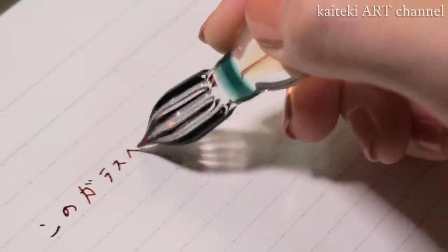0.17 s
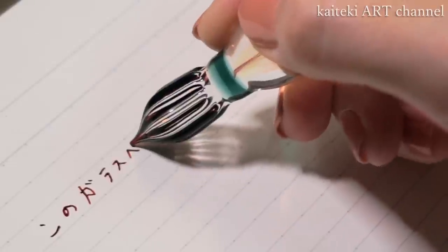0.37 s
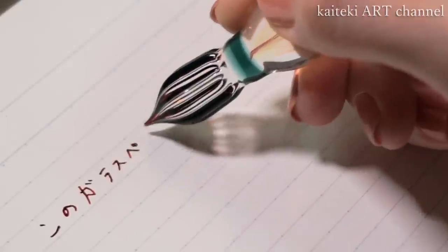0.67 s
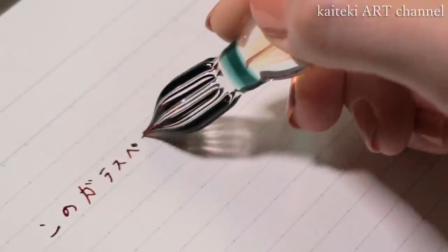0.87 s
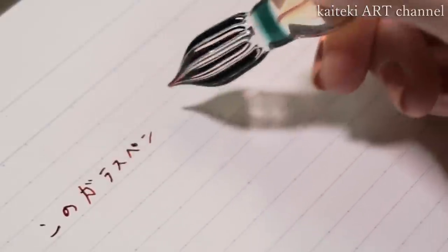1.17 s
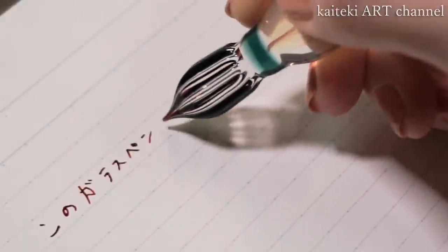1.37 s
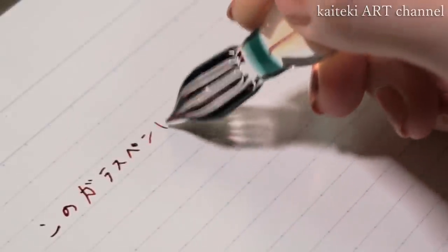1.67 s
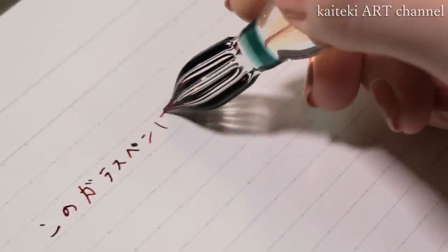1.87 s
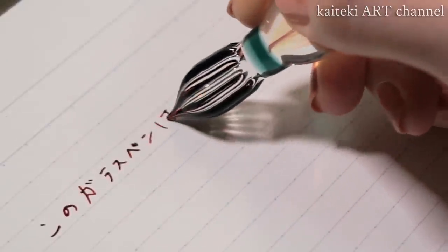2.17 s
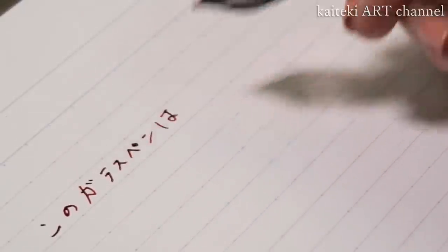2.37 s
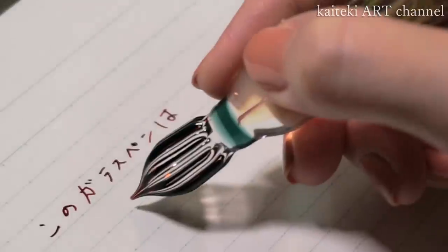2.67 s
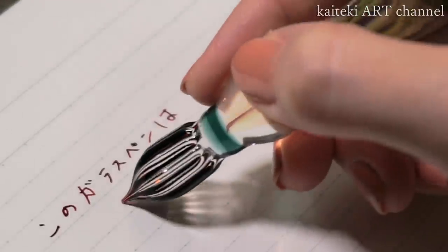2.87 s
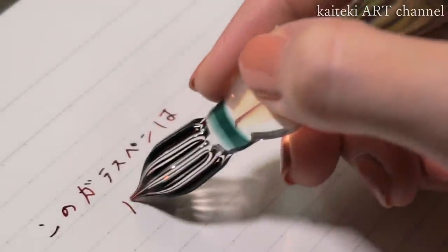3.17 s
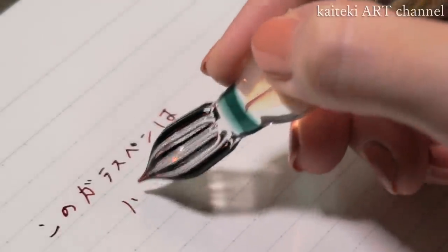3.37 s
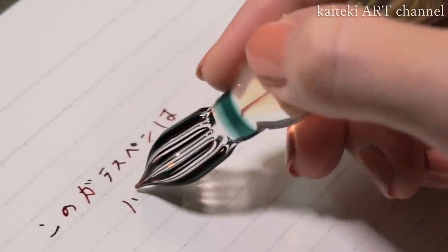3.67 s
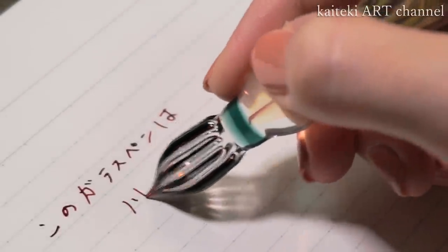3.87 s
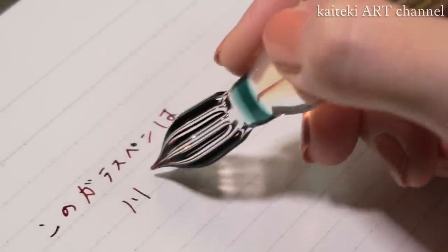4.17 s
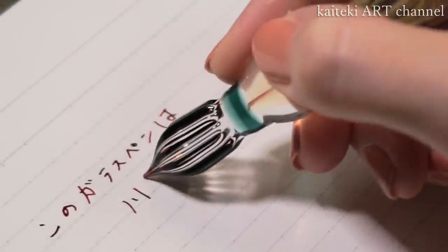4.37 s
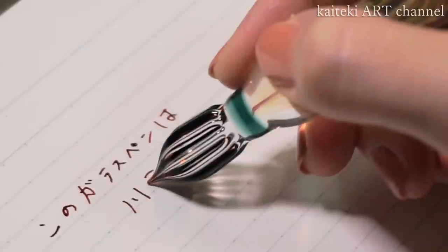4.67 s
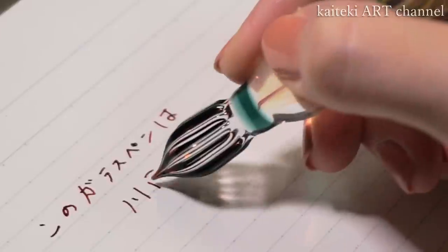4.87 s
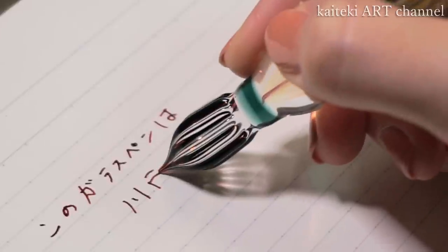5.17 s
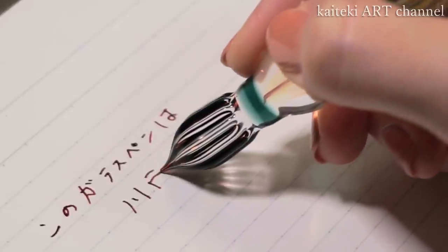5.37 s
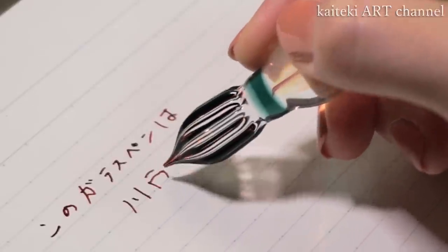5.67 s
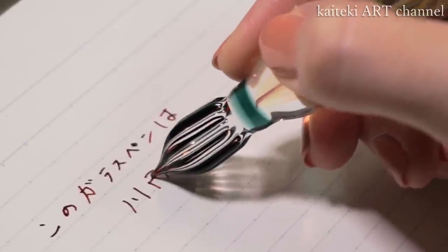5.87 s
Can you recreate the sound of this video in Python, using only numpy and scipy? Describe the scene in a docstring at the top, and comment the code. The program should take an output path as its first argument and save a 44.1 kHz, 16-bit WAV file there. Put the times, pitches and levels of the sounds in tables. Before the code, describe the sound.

Close handwriting with a glass nib: dull little desk taps, bright ticks, thin glassy scratches, and an occasional soft hiss of the hand sliding.

```python
"""First a short stroke of a glass pen on paper in a quiet room, then a knock as the pen lands on the desk.
Each landing is a push on the desk's resonances, with a ping of the glass and a woody click.
The nib ticks on the paper; random grit in each stroke makes glass, paper and desk sound.
The hand slides with a noisy hiss and rumbles low as it shifts; a faint moan and chirp are narrow noise."""
import sys
import numpy as np
from scipy import signal
from scipy.fft import rfft, irfft, next_fast_len
from scipy.io import wavfile
from scipy.ndimage import uniform_filter1d

SR = 44100
rng = np.random.default_rng(int(sys.argv[2]) if len(sys.argv) > 2 else 0)


def to_wav(s):
    """Save 16-bit WAV."""
    ch = np.atleast_2d(s).T  # columns
    pcm = np.round(np.clip(ch, -1, 1) * 32767)  # PCM
    wavfile.write(sys.argv[1], SR, pcm.astype(np.int16))


N = 265923  # length [samples]
STOP_DB = 4  # extra drop that grows very fast once a pen stroke or hand slide is past either end [dB]


def amp(db):
    """Turns dB into a gain."""
    return 10 ** (np.asarray(db) / 20)


def evened(x):
    """Scales a sound to an rms (average strength) of 1."""
    return x / np.sqrt(np.mean(x ** 2) + 1e-20)


def colour(x, points):
    """Filters a sound through (frequency [Hz], level [dB]) points on a log-frequency axis."""
    f, db = np.transpose(points)
    size = next_fast_len(len(x))
    hz = np.fft.rfftfreq(size, 1 / SR) + 1  # the 1 avoids log(0)
    gain = amp(np.interp(np.log(hz), np.log(f), db))
    return irfft(rfft(x, size) * gain, size)[:len(x)]


def resonate(x, hz, width):
    """A resonance of gain 1; a moving one shifts hz down to zero, smooths, and shifts back."""
    r = np.exp(-np.pi * width / SR)
    if np.ndim(hz) == 0:
        return 2 * signal.lfilter([1 - r], [1, -r * np.exp(2j * np.pi * hz / SR)], x).real
    turn = np.exp(2j * np.pi * np.cumsum(hz) / SR)
    return 2 * (turn * signal.lfilter([1 - r], [1, -r], x / turn)).real


def sing(x, modes):
    """Rings each mode twice over, so that the gaps between modes stay quiet."""
    return sum(amp(db) * resonate(resonate(x, hz, width), hz, width) for hz, width, db in modes)


def grit(per_s, spread_db):
    """Paper fibres catching at random moments, a few of them hard; rms 1."""
    sizes = amp(spread_db * np.minimum(rng.exponential(1, N), 4))
    sizes = sizes * rng.choice([-1, 1], N)
    caught = rng.random(N) < per_s / SR
    return evened(sizes * caught)


def patchy(x, patchy_db):
    """Random louder and softer patches, about 500 Hz by 30 ms."""
    z = signal.stft(x, nperseg=256)[2]
    patches = uniform_filter1d(rng.standard_normal(z.shape), size=3, axis=0)
    patches = uniform_filter1d(patches, size=10, axis=1)
    return signal.istft(z * amp(patchy_db * evened(patches)), nperseg=256)[1][:N]


def swells(rows, column, drop_db, bend, share=1, stop_db=0):
    """Gain over time: each row rises to its level at one moment and falls away again."""
    t = np.arange(N // 32 + 2) * 32 / SR  # one point every 32 samples
    power = 0
    for row in rows:
        side_s = share * np.where(t < row[0], row[1], row[2])
        away = np.minimum(abs(t - row[0]) / side_s, 5)  # 0 at the peak, 1 at either end
        power = power + amp(row[column] - drop_db * away ** bend - stop_db * away ** 10) ** 2
    return np.interp(np.arange(N) / SR, t, np.sqrt(power))


# colour of the quiet air and hiss: (frequency [Hz], relative level per Hz [dB])
AIR_COLOUR = [(12, -43), (22, 2.5), (38, -11.5), (55, 1), (100, -6.5), (145, -4.5), (234, -9), (347, -15.5),
              (624, -20), (1030, -28), (4940, -37), (12400, -37.5), (16000, -38)]
# wavering part of the hum: (frequency [Hz], width [Hz], level [dB])
WAVERING_HUM = (90, 14, -74)
AIR_DB, HUM_TONE_DB = -62, -67.5


def room():
    """Quiet air and microphone hiss as coloured noise, with a low hum of narrow noise and a steady tone."""
    hz, width, db = WAVERING_HUM
    air = amp(AIR_DB) * evened(colour(rng.standard_normal(N), AIR_COLOUR))
    tone = evened(np.sin(2 * np.pi * (hz * np.arange(N) / SR + rng.random())))
    wavering = evened(sing(rng.standard_normal(N), [(hz, width, 0)]))
    return air + amp(db) * wavering + amp(HUM_TONE_DB) * tone


# path of a faint low moan: (time [s], frequency [Hz], level [dB])
MOAN_PATH = [(2.56, 323, -60), (2.602, 340, -65.5), (2.66, 288, -51), (2.692, 303, -57.5), (2.76, 312, -85)]
# path of a short faint chirp: (time [s], frequency [Hz], level [dB])
CHIRP_PATH = [(3.38, 1720, -79), (3.394, 1750, -72), (3.44, 1760, -82)]


def whistle(rows, width_hz):
    """A moan or chirp: noise in a narrow resonance whose pitch moves."""
    s, hz, db = np.transpose(rows)
    t, noise = np.arange(N) / SR, rng.standard_normal(N)
    pitch = np.interp(t, s, hz)
    level = amp(np.interp(t, s, db)) * (t > s[0]) * (t < s[-1])
    narrow = resonate(resonate(noise, pitch, width_hz), pitch, width_hz)
    return evened(narrow) * uniform_filter1d(level, size=400)  # smoothing softens both ends


# ways the desk top rings, as heard at the microphone:
# (frequency [Hz], relative level [dB], time to fade by 60 dB [s], polarity of the mode shape [+1 or -1])
DESK_MODES = [(60, -30.1, 0.22, -1), (84, -14.3, 0.063, 1), (138, -16.5, 0.128, 1), (169, -11.7, 0.066, -1),
              (200, -35.2, 0.4, 1), (230, -5.2, 0.103, -1), (292, -22.8, 0.208, -1), (302, -9.8, 0.057, 1),
              (379, -21.8, 0.151, 1), (428, -9.0, 0.099, 1), (455, -34.8, 0.4, 1), (480, -37.2, 0.4, -1),
              (497, -13.7, 0.042, -1), (586, -22.5, 0.044, -1), (661, -20.7, 0.039, -1),
              (764, -22.0, 0.027, 1), (1075, -40.1, 0.051, 1)]


def desk_ring():
    """Desk top after a short blow: fading sines scaled to peak 1, a dull noise tail from the room, no deep bass."""
    t = np.arange(SR // 2) / SR
    modes = sum(side * amp(db - 60 * t / t60) * np.sin(2 * np.pi * hz * t)
                for hz, db, t60, side in DESK_MODES)
    dull = colour(rng.standard_normal(len(t)), [
        (35, -45), (70, -3), (140, 0.5), (300, 2.5), (450, -16.5), (560, -9),
        (790, -16), (880, -42), (1150, -31.5), (3000, -96)])
    tail = amp(-18.5 - 60 * t / 0.28) * evened(dull) * np.clip(t / 0.021, 0, 1) ** 2
    no_deep_bass = signal.butter(2, 40, "high", fs=SR, output="sos")
    return signal.sosfilt(no_deep_bass, modes / abs(modes).max() + tail)


# the resting hand shifts its weight:
# (time [s], swell [s], fade [s], deep sway level [dB], lowest desk mode level [dB])
WEIGHT_SHIFTS = [(0.17, 0.14, 0.067, -59.5, -59), (0.37, 0.18, 0.087, -57, -64),
                 (0.59, 0.12, 0.14, -55.5, -54.5), (0.87, 0.16, 0.029, -53, -65),
                 (1.17, 0.19, 0.093, -51, -73), (1.63, 0.11, 0.18, -54.5, -72),
                 (1.97, 0.37, 0.15, -56, -68), (2.47, 0.14, 0.034, -49.5, -86),
                 (2.85, 0.12, 0.065, -54.5, -55), (3.02, 0.057, 0.042, -47, -72),
                 (3.26, 0.29, 0.051, -55.5, -67), (3.85, 0.3, 0.11, -55.5, -71),
                 (4.03, 0.11, 0.18, -52.5, -77), (4.35, 0.049, 0.078, -53, -47),
                 (4.65, 0.03, 0.09, -52, -42), (4.89, 0.25, 0.15, -54.5, -45), (5.1, 0.19, 0.22, -59, -56),
                 (5.41, 0.1, 0.19, -61, -72)]
# the heel of the hand settles on the desk: (time [s], swell [s], fade [s], murmur level [dB])
HAND_SETTLES = [(2.62, .08, 0.067, -64), (5.9, 0.016, .04, -60)]
# colour of the deep sway: (frequency [Hz], relative level per Hz [dB])
SWAY_COLOUR = [(5, -7), (14, 12.5), (28, 10.5), (38, -1), (70, -40.5)]
# lowest mode of the desk: (frequency [Hz], width [Hz], relative level [dB])
LOWEST_DESK_MODE = [(49.8, 19.6, 0)]
WEIGHT_DROP_DB, WEIGHT_BEND = 24.5, 2.5  # drop at either end of a swell [dB], steepness
RESTING_DB, MURMUR_DB = -79, -73  # sway and desk murmur at rest
# murmur while the pen bears down, relative to the landing [dB], and its timing [s]
PRESS_DB, PRESS_RISE_S, PRESS_FADE_S = -30.5, .03, 0.035


def hand(ring):
    """Low rumble as the hand shifts, and noise through the desk that swells after each landing."""
    rumble = colour(rng.standard_normal(N), SWAY_COLOUR)
    murmur = signal.oaconvolve(rng.standard_normal(N), ring)[:N]
    weight = amp(RESTING_DB) + swells(WEIGHT_SHIFTS, 3, WEIGHT_DROP_DB, WEIGHT_BEND)
    press = amp(MURMUR_DB) + swells(HAND_SETTLES, 3, WEIGHT_DROP_DB, WEIGHT_BEND)
    t = np.arange(N) / SR
    for s, db, *_ in LANDINGS:
        since = np.clip(t - s, 0, 1)
        rise = 1 - np.exp(-since / PRESS_RISE_S)
        press += amp(db + PRESS_DB) * rise * np.exp(-since / PRESS_FADE_S)
    low = evened(sing(rng.standard_normal(N), LOWEST_DESK_MODE))
    low = low * swells(WEIGHT_SHIFTS, 4, WEIGHT_DROP_DB, WEIGHT_BEND)
    return evened(rumble) * weight + low + evened(murmur) * press


# slides of the hand:
# (fastest moment [s], speeding up [s], slowing down [s], bright hiss level [dB], dull hiss level [dB])
HAND_SLIDES = [(0.7, 0.069, 0.044, -63, -62.5), (1.245, .11, 0.11, -45.5, -45.5),
               (1.4, 0.08, 0.064, -76, -73.5), (2.38, 0.079, 0.08, -68.5, -89.5),
               (2.52, .1, 0.047, -60, -65.5), (2.58, 0.064, 0.05, -66, -65.5),
               (3.42, 0.061, 0.053, -77, -73), (4.09, 0.052, 0.077, -58, -69.5)]
# colour of the bright hiss: (frequency [Hz], relative level per Hz [dB])
BRIGHT_HISS = [(3000, -29), (6000, -15), (7800, -5.5), (10500, -3.5), (13000, -12.5), (16000, -19)]
# colour of the dull hiss: (frequency [Hz], relative level per Hz [dB])
DULL_HISS = [(500, -30), (1000, -4.5), (1500, -2.5), (2500, -1.5), (4200, 0.5), (6000, -4), (9000, -8)]
SLIDE_DROP_DB, SLIDE_BEND = 27.5, 2.12  # drop at either end of a slide [dB], steepness


def slides():
    """Skin on paper: a wide, slightly uneven hiss, duller or brighter with the part of the hand that drags."""
    uneven_db = 1.8
    bright = evened(colour(patchy(rng.standard_normal(N), uneven_db), BRIGHT_HISS))
    dull = evened(colour(patchy(rng.standard_normal(N), uneven_db), DULL_HISS))
    bright_level, dull_level = (
        swells(HAND_SLIDES, k, SLIDE_DROP_DB, SLIDE_BEND, stop_db=STOP_DB) for k in (3, 4))
    return bright * bright_level + dull * dull_level


# landings of the pen on the desk: (time [s], push strength [dB], half-width of the push [s],
# ping of the glass before shaping [dB], woody click before shaping [dB])
LANDINGS = [(0.3159, -17, 0.00025, -57, -54), (0.8429, -15.5, 0.00072, -62, -47.5),
            (1.0248, -14.5, 0.00019, -46.5, -41.5), (1.0836, -31, 0.00018, -72, -45),
            (1.578, -16.5, 0.00069, -52, -59), (1.8474, -10.5, 0.000073, -56, -45.5),
            (2.8727, -18, 0.000085, -51.5, -53), (2.971, -37.5, .0002, -67, -47.5),
            (3.1856, -15, 0.000071, -55.5, -53), (3.766, -21.5, 0.0011, -56, -61.5),
            (4.3796, -17.5, 0.00044, -61, -53), (4.672, -17, 0.00061, -60, -51.5),
            (4.975, -18.5, 0.00077, -63, -68), (5.9306, -16, 0.0023, -64, -74)]


def pushes():
    """Force on the desk: one smooth pulse a landing; a longer contact gives a duller knock."""
    t, force = np.arange(N) / SR, np.zeros(N)
    for s, db, contact, *_ in LANDINGS:
        pulse = np.exp(-2 * ((t - s) / contact) ** 2)
        force += amp(db) * pulse / pulse.sum()
    return force


# the pen bending from side to side: (frequency [Hz], width [Hz], relative level [dB])
BENDING_MODES = [(2382, 90, 0)]


def pings():
    """A landing also rings the pen's bending mode, over a brief woody click of resonant noise."""
    t, out = np.arange(3000) / SR, np.zeros(N + 3000)
    noises = rng.standard_normal((len(LANDINGS), 3000))
    for (s, _, _, ping_db, click_db), noise in zip(LANDINGS, noises):
        ping = np.sin(2 * np.pi * BENDING_MODES[0][0] * t)
        ping = ping * np.exp(-t / 0.0077) * (1 - np.exp(-t / 0.005))
        click = evened(sing(noise, [(1017, 326, -5), (1500, 1230, -25.5)]))
        click = click * np.exp(-t / 0.0064) * (1 - np.exp(-t / 0.0002))
        out[round(s * SR):][:3000] += amp(ping_db) * ping + amp(click_db) * click
    return out[:N]


# the nib touches or snags the paper: (time [s], level before the bass cut [dB], centre frequency [Hz])
NIB_TICKS = [(0.3145, -48.5, 7260), (0.842, -59, 8100), (0.926, -64, 9000), (1.0235, -41, 7440),
             (1.1104, -59, 8000), (1.5738, -47, 7950), (1.704, -54, 8000), (1.8463, -47.5, 7850),
             (2.872, -45, 7600), (3.182, -42.5, 7850), (3.7594, -47.5, 7840), (3.871, -42, 7900),
             (4.0467, -53, 3000), (4.3774, -46.5, 7600), (4.6703, -52, 7850), (4.9736, -51, 8200),
             (5.9274, -54.5, 7900)]


def ticks():
    """Tiny bursts of noise; each leaves the glass ringing faintly along its length."""
    out, t = np.zeros(N + 2000), np.arange(2000) / SR
    noises = rng.standard_normal((len(NIB_TICKS), 2000))
    for (s, db, hz), noise in zip(NIB_TICKS, noises):
        shape = np.exp(-((t - .0013) / .0006) ** 2)
        burst = resonate(resonate(noise * shape, hz, 3600), hz, 3600)
        glass = amp(-19) * evened(sing(noise, LENGTHWISE_MODES))
        wide = amp(-22.5) * evened(resonate(noise, 6700, 6000))
        after = (glass + wide) * np.exp(-t / 0.0096) * np.clip(t / 0.0023, 0, 1)
        out[round(s * SR):][:2000] += amp(db) * (burst / abs(burst).max() + after)
    return signal.sosfilt(signal.butter(2, 3000, "high", fs=SR, output="sos"), out[:N])


# strokes of the nib, friction by direction, levels before the gains below:
# (fastest moment [s], speeding up [s], slowing down [s], sideways [dB], lengthwise [dB],
# at the tip [dB], into the desk [dB], paper scrape [dB])
NIB_STROKES = [(0.0, .01, 0.03, -81, -75, -80, -57.5, -65), (0.1, .04, 0.046, -61, -67, -60.5, -71, -70),
               (0.2, 0.031, 0.02, -78, -85, -95, -95, -98), (0.4, 0.012, 0.018, -79, -73, -86, -78, -97),
               (0.47, 0.037, 0.088, -72, -83, -85, -92, -90), (0.912, 0.02, 0.011, -61, -71, -71, -69, -73),
               (1.088, 0.026, .04, -57.5, -56.5, -63, -48.5, -61),
               (1.652, 0.038, 0.038, -49.5, -65, -55.5, -50.5, -64.5),
               (1.915, 0.021, 0.033, -63, -63, -60, -48, -62),
               (2.09, 0.038, .04, -53, -64, -64.5, -63.5, -64),
               (2.2, 0.085, 0.026, -69, -74.5, -77, -94, -89),
               (2.3, 0.064, 0.032, -65, -71.5, -68, -70, -75.5),
               (2.97, 0.035, 0.039, -49.5, -52.5, -60, -46.5, -58),
               (3.285, 0.027, 0.04, -69, -73, -78, -56.5, -81),
               (3.91, 0.051, 0.047, -50, -53, -57.5, -48.5, -56),
               (4.47, 0.048, 0.041, -66, -60.5, -64.5, -53.5, -67.5),
               (4.79, 0.053, .05, -60, -62, -65, -56, -66),
               (5.085, 0.046, 0.045, -70, -60.5, -68, -58.5, -66.5),
               (5.195, 0.041, 0.011, -78, -78, -82, -80, -98),
               (5.445, 0.03, 0.037, -78, -82, -89, -93, -102),
               (5.575, 0.033, 0.049, -54.5, -68, -74, -58.5, -70),
               (6.02, 0.035, .05, -57, -64, -70, -58, -69.5)]
# glass ringing along its length: (frequency [Hz], width [Hz], relative level [dB])
LENGTHWISE_MODES = [(4044, 107, -13.5), (6460, 180, -8), (6720, 100, -5), (7226, 280, -2.5),
                    (7680, 700, -14.5), (9170, 160, -15.5), (10750, 500, -26.5)]
# glass ringing at the tip: (frequency [Hz], width [Hz], relative level [dB])
TIP_MODES = [(12580, 170, 18), (12200, 2300, -33)]
# colour of the paper under the nib: (frequency [Hz], relative level per Hz [dB])
PAPER_COLOUR = [(400, 9), (1000, 4.5), (1900, 1.5), (2900, -3.5), (3600, -12), (4500, -21.5), (5700, -12),
                (8000, -16), (12000, -21.5), (16000, -26)]
# the sheet's rasp when the nib is pulled straight: (frequency [Hz], width [Hz], relative level [dB])
SHEET_RASP = [(2900, 1100, 0), (4500, 700, -6)]
STROKE_DROP_DB, STROKE_BEND = 13, 1.34  # drop at either end of a stroke [dB], steepness
PAPER_DB, RASP_DB = 6.5, 2.5  # gains on the paper scrape level
DESK_SHARE = 0.5  # the nib bears down on the desk for this share of the stroke
FLUTTER_DB, FLUTTER_S = 1.5, 0.0085  # the nib grips and lets go unevenly within a stroke


def strokes(ring):
    """Grit under the nib drives three families of glass modes, the paper and the desk."""
    out = np.zeros(N)
    sideways, lengthwise, tip, scrape = (
        swells(NIB_STROKES, k, STROKE_DROP_DB, STROKE_BEND, stop_db=STOP_DB) for k in (3, 4, 5, 7))
    families = [(sideways, BENDING_MODES), (lengthwise, LENGTHWISE_MODES), (tip, TIP_MODES)]
    for level, modes in families:
        flutter = uniform_filter1d(rng.standard_normal(N), round(FLUTTER_S * SR))
        drive = grit(per_s=5400, spread_db=3.5) * amp(FLUTTER_DB * evened(flutter))
        out += sing(drive * level, modes) / np.std(sing(drive, modes))
    # near 1 when the nib is pulled without bending
    straight = lengthwise ** 2 / (lengthwise ** 2 + sideways ** 2 + 1e-12)
    rasp = evened(sing(grit(per_s=3200, spread_db=5.0), SHEET_RASP))
    out += amp(RASP_DB) * rasp * scrape * straight
    paper = evened(colour(grit(per_s=10000, spread_db=6.5), PAPER_COLOUR))
    out += amp(PAPER_DB) * paper * scrape
    bumps = evened(colour(grit(per_s=2900, spread_db=2.0),
                          [(100, -7), (300, 5.5), (700, 6.5), (2000, 3.5)]))
    down = swells(NIB_STROKES, 6, STROKE_DROP_DB, STROKE_BEND, DESK_SHARE, STOP_DB)
    return out + amp(-12.5) * signal.oaconvolve(bumps * down, ring)[:N]


def scene():
    """All sources added at one microphone."""
    ring = desk_ring()
    knocks = signal.oaconvolve(pushes(), ring)[:N]
    pen = knocks + pings() + ticks() + strokes(ring)
    faint = whistle(MOAN_PATH, width_hz=63) + whistle(CHIRP_PATH, width_hz=170)
    return (pen + slides() + hand(ring) + faint + room())[None]


def record(dry):
    """Band limit of the recorder: a steep low-pass filter at 15800 Hz."""
    low_pass = signal.firwin(1023, 15800, window=("kaiser", 9), fs=SR)
    return signal.oaconvolve(dry, low_pass[None], "same")


dry = scene()
out = record(dry)
to_wav(out)
```